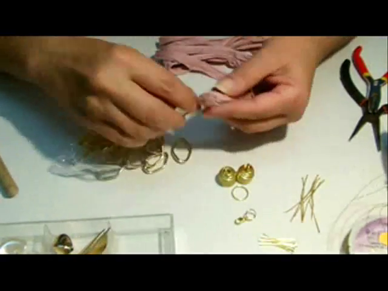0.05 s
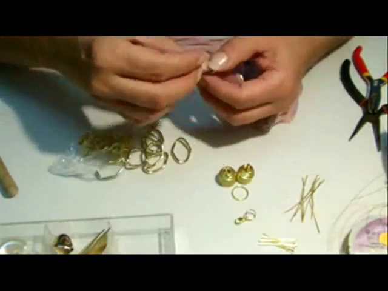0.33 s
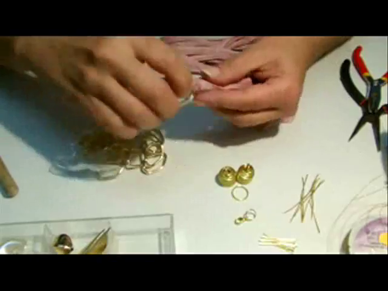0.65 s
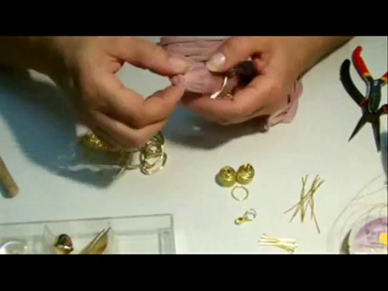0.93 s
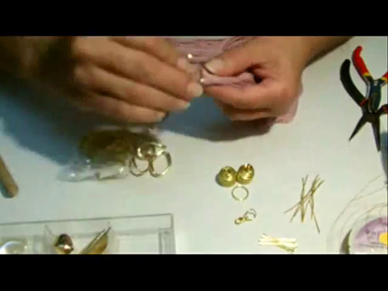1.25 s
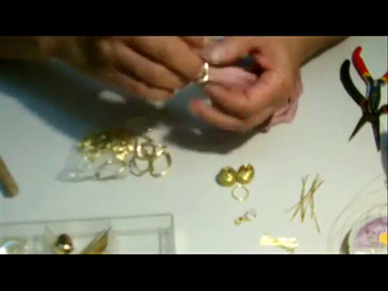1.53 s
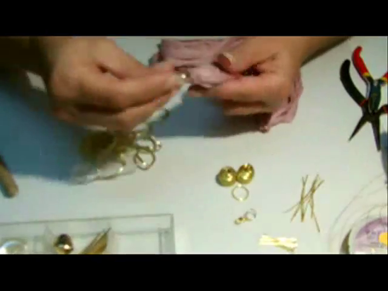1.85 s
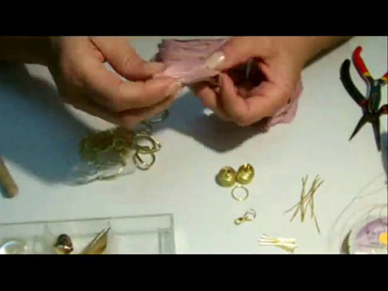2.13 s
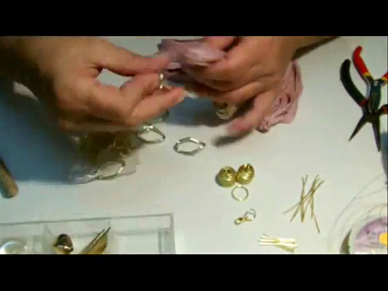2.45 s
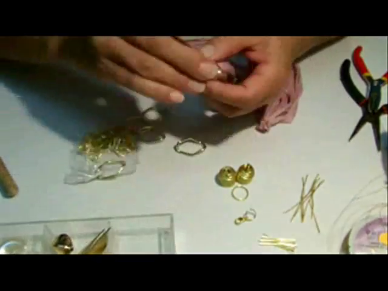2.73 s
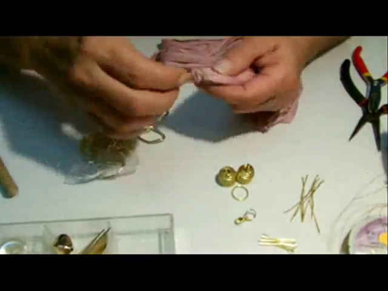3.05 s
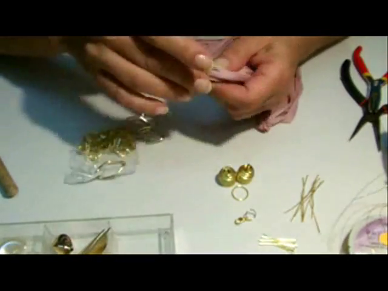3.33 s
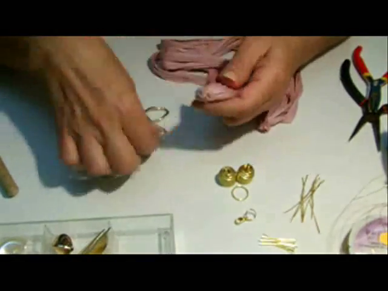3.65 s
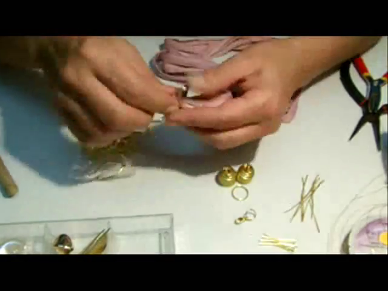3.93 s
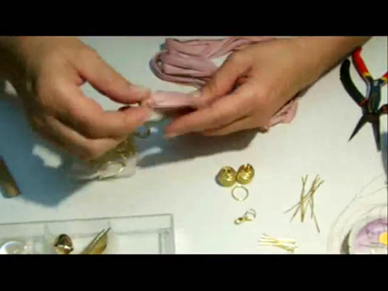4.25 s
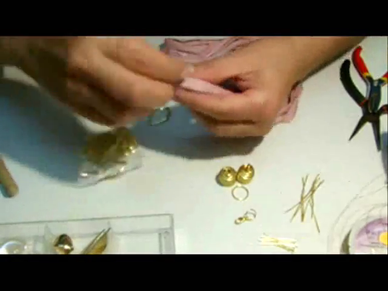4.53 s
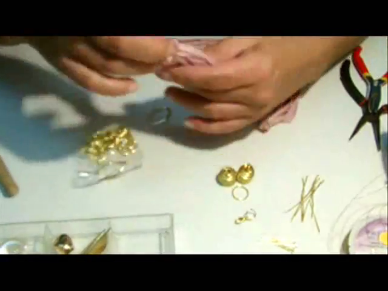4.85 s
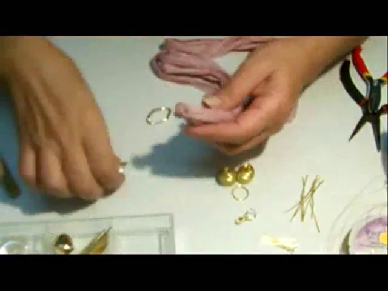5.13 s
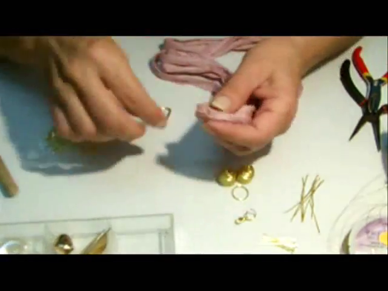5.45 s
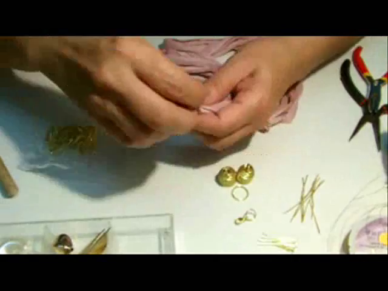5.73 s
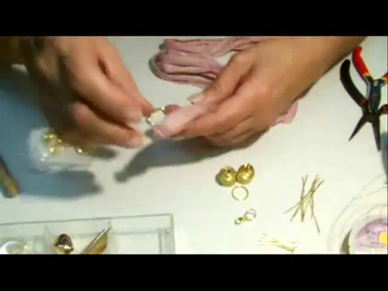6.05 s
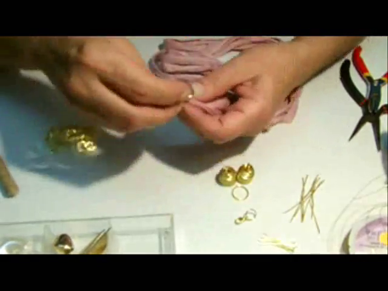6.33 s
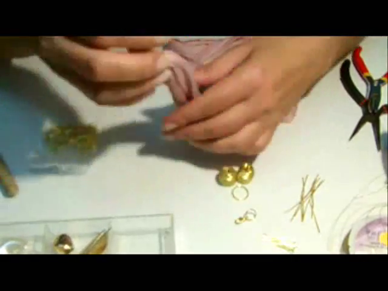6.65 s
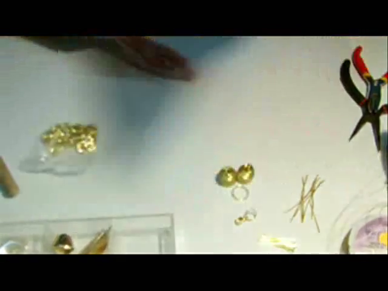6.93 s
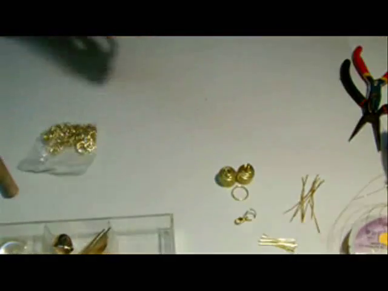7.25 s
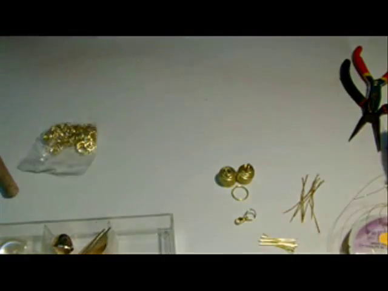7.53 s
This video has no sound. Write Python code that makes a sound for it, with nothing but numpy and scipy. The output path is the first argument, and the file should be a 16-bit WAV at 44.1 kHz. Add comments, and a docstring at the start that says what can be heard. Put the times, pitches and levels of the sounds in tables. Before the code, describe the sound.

Small metal chain links click and clink as they are handled on a table, with a plastic bag crackling over steady hiss.

```python
"""A work table in a small room, stereo microphone close in, over a steady hiss: hands thread a cloth band
through a metal chain. It opens with dry snaps from gripped links and the plastic bag under them, and a
short drag of the heap. From 1.2 s loose links clink and ring briefly. A larger hoop rings out at 4.3 s,
the snaps are loudest from 5.1 to 5.6 s, then fingers slide faintly along the cloth. In the last half
second the heap is dragged again, rustling and jingling."""
import sys
import numpy as np
from scipy import signal
from scipy.fft import rfft, irfft, next_fast_len
from scipy.io import wavfile
from scipy.ndimage import uniform_filter1d

SR = 44100
rng = np.random.default_rng(int(sys.argv[2]) if len(sys.argv) > 2 else 0)


def inscribe(sig):
    """Save sig as 16-bit PCM at rate SR to the path in sys.argv[1].

    A 1-D sig is mono; a 2-D sig holds one channel per row.
    Samples are clipped to [-1, 1] before scaling.
    """
    pcm = np.round(np.clip(np.atleast_2d(sig).T, -1, 1) * 32767)
    wavfile.write(sys.argv[1], SR, pcm.astype(np.int16))


N = 334719
GRAIN, LEAD = 4096, 1024  # samples: length of one short sound, and its run-up to the impact
LINK_HZ, LINK_T60_S = 8870, 0.013  # ring of an average small link

# Spectrum of the noise floor. Each row: frequency in Hz, relative level in dB.
HISS_COLOUR = [(12, -44), (20, -6), (48, -5.5), (130, -6.5), (168, -9.5), (210, -7.5), (255, -7), (319, -6),
               (542, -6), (1190, -4.5), (2990, -3.5), (3840, -3.5), (7950, -5.5), (14300, -7.5),
               (16000, -23)]
# How alike the hiss is left and right. Each row: frequency in Hz, correlation from 0 to 1.
HISS_CORRELATION = [(60, 0.1), (240, 0.3), (950, 0.15), (3770, 0.66), (15000, 1)]
# Decay of the room. Each row: frequency in Hz, T60 in seconds.
ROOM_DECAY = [(150, 0.0046), (1000, 0.2), (4000, 0.11), (14000, 0.1)]
# Spectrum of the room's tail. Each row: frequency in Hz, relative level in dB.
TAIL_COLOUR = [(100, -1), (1000, -8.5), (2500, -2), (5000, -2.5), (9000, -6.5), (15000, -1.5)]
# Echoes off the table and hands. Each row: delay in seconds, gain in dB.
NEAR_ECHOES = [(.0018, -36.5), (.003, -26), (.0052, -22.5)]
# Sound scattered by table and hands into the side signal. Each row: frequency in Hz, gain in dB.
SIDE_COLOUR = [(60, -6), (250, 0), (1000, -5.5), (2400, -4.5), (4600, -19.5), (8500, -16), (13000, -14.5)]
# Moments when the stereo image opens. Each row: start in seconds, end in seconds.
WIDE_SPANS = [(1.8, 1.9), (3.72, 3.81), (5.0, 5.07), (6.66, 6.71), (7.44, 7.5)]
# The microphone's lean to the left. Each row: frequency in Hz, left over right in dB.
LEFT_LEAN = [(100, 2), (600, 0.5), (2000, 1.2), (5000, 0.5), (12000, 0.5)]
# The heap dragged over its bag. Each row: start in seconds, end in seconds, level in dB.
HEAP_DRAGS = [(0, 0.073, -36.5), (0.657, 0.691, -37.5), (1.01, 1.072, -46), (1.167, 1.24, -30.5),
              (1.84, 1.896, -41), (2.444, 2.531, -34), (2.809, 2.88, -53.5), (3.843, 3.932, -46),
              (4.114, 4.23, -54), (6.614, 6.729, -49.5), (6.776, 7.048, -57.5), (7.113, 7.584, -44),
              (7.23, 7.385, -33), (7.419, 7.44, -27)]
# Spectrum of one tick of the rustle. Each row: frequency in Hz, relative level in dB.
RUSTLE_COLOUR = [(30, -6.5), (180, -8), (450, -8.5), (1100, -6.5), (2600, -7), (3900, -4.5), (5500, -2.5),
                 (7600, -2), (9000, 1.5), (10500, -4.5), (12500, -2), (14300, -6.5), (15500, -14.5)]
# A link pressed down on the table top. Each row: time in seconds, level in dB.
LINK_KNOCKS = [(.036, -29.5), (0.047, -43.5), (1.736, -44)]
# The table top's hollow note. Each row: frequency in Hz, relative level in dB, T60 in seconds.
TABLE_TOP_MODES = [(967, 0.5, 0.02), (1106, 0, 0.012), (2680, -5, 0.027), (3980, -9, 0.018)]
# The heap bumping the table. Each row: time in seconds, level in dB.
HEAP_BUMPS = [(1.181, -43), (4.523, -42), (5.15, -34), (7.138, -41), (7.337, -40.5)]
# The board's low modes. Each row: frequency in Hz, relative level in dB, T60 in seconds.
BOARD_MODES = [(86, -17, 0.08), (137, -2, 0.055), (198, 2.5, 0.039)]
# Bag creases and gripped links snapping. Each row: time in seconds, level in dB,
# scrape time in seconds, treble tilt in dB per octave.
DRY_SNAPS = [(0.04, -31, 0.0026, -4), (0.0658, -28, 0.0014, 1), (0.0918, -25.5, 0.00017, 0),
             (0.2461, -40.5, 0.000053, 1), (.2826, -45, .001, 2), (0.4254, -42.5, 0.00021, 1),
             (0.5794, -34, 0.0049, 1.5), (.604, -39.5, .0008, 3), (0.6655, -24.5, 0.00019, 1.5),
             (1.0236, -37, .005, 5.5), (1.1147, -36, .0023, 3), (1.1767, -21.5, .0002, 1.5),
             (1.181, -21.5, 0.00051, 7.5), (1.7171, -38.5, .0026, 0), (1.7364, -39, 0.0039, -2.5),
             (2.223, -33, 0.0028, 0.5), (2.449, -24, 0.00017, 8), (2.46, -24, 0.0033, .5),
             (2.506, -29, .001, 3.5), (2.5981, -36, .0005, 0), (2.931, -39, 0.0017, 1.5),
             (3.0401, -36.5, 0.00024, 2), (3.0472, -37.5, 0.00024, 1.5), (3.668, -24.5, 0.00097, 1),
             (3.7404, -22.5, 0.0019, 1.2), (4.501, -25.5, .004, .3), (4.5227, -23.5, 0.0003, -1.5),
             (4.9672, -45, .0015, 0), (5.0947, -25.5, 0.000048, 1), (5.11, -20.5, .0003, 1.6),
             (5.1219, -27, .0012, 1.8), (5.1495, -18.5, 0.00095, -0.5), (5.159, -24.5, 0.00054, -1),
             (5.1645, -25, 0.001, 4.5), (5.2427, -37, 0.0027, -1.5), (5.2968, -38, 0.0037, 1),
             (5.459, -41, 0.00088, 0), (5.5173, -17, 0.00043, 3), (5.548, -21.5, 0.0021, 2),
             (5.5734, -24, 0.00066, 1.5), (5.5873, -24.5, 0.00019, 3), (5.661, -32, 0.004, -0.2),
             (6.1537, -38, 0.0011, 0.3), (6.2165, -40, .0004, -1), (6.6657, -36.5, .0003, 4),
             (6.6846, -27, 0.00062, 3), (6.7213, -32.5, 0.00094, 0.5), (6.7982, -38.5, 0.0022, -.5),
             (6.8707, -31.5, 0.0011, 6), (7.1366, -27.5, .0023, 8), (7.3763, -28, 0.0017, 1)]
# Spectrum of a snap before its tilt. Each row: frequency in Hz, relative level in dB.
SNAP_SPECTRUM = [(30, -4.5), (250, -2), (700, -2.5), (1200, -4), (2800, -3), (4200, -1), (5300, -2.5),
                 (7300, 0.5), (12600, -4.5), (15000, -6.5)]
# Spectrum of metal touching metal. Each row: frequency in Hz, relative level in dB.
CONTACT_SPECTRUM = [(30, -6), (200, -0.5), (1200, -0.5), (2500, -2), (4000, -2), (5500, -1), (9000, 11.5),
                    (12000, -0.5), (15000, -8.5)]
# The large oval hoop struck. Each row: time in seconds, level in dB, pitch in Hz, slide-in in seconds.
HOOP_CLINKS = [(.0922, -28.5, 4110, 0.00011), (4.3478, -16.5, 5300, 0.00031), (5.5175, -19, 5250, 0.000083),
               (6.2246, -25.5, 5450, .0001)]
# The hoop's modes. Each row: multiple of its pitch, relative level in dB.
HOOP_MODES = [(0.509, -6), (0.602, -9), (.78, 1), (0.999, 1.5), (1.08, -2), (1.25, -5), (1.52, -4),
              (1.69, -7.5)]
# Small links colliding. Each row: time in seconds, level in dB, pitch in Hz, slide-in in seconds.
LINK_CLINKS = [(1.221, -21, 9100, 0.0026), (1.2332, -22, 9230, 0.0023), (1.816, -28, 8400, 0.00024),
               (1.848, -22, 9330, 0.0018), (1.8814, -29.5, 9450, .0002), (2.0577, -39, 8550, .0002),
               (2.23, -32.5, 8370, 0.00082), (2.2764, -32.5, 8840, .0002), (2.3636, -24, 8530, 0.00033),
               (2.4797, -22, 9300, 0.00083), (2.5417, -28.5, 8000, .002), (2.8313, -34, 8800, .002),
               (2.9143, -42, 9100, .0002), (3.0066, -39, 9100, 0.00048), (3.1377, -39, 9050, 0.00053),
               (3.5725, -36, 8660, .0008), (3.6102, -34, 9130, .0002), (3.7851, -22, 8760, 0.0027),
               (4.1942, -31.5, 9050, 0.00061), (4.2877, -28.5, 7800, 0.00024), (4.3959, -40.5, 8250, .0002),
               (5.012, -24, 9380, 0.0029), (5.036, -22, 8780, 0.0021), (6.0634, -44.5, 9800, .0002),
               (6.1393, -37, 8500, .0002), (6.6233, -33, 9900, .0002), (6.6336, -32, 9100, 0.00095),
               (6.6756, -26, 8880, 0.00027), (7.1513, -25.5, 8180, 0.0005), (7.2465, -26, 8580, 0.00091),
               (7.317, -20.5, 8920, 0.0047), (7.339, -19.5, 8600, 0.0038), (7.4652, -23.5, 8910, 0.0045),
               (7.5021, -30.5, 8900, 0.00032), (7.5178, -28.5, 10100, 0.0011)]
# Bending modes of one link. Each row: multiple of its pitch, relative level in dB.
LINK_MODES = [(.62, -24), (.87, -9.5), (.95, 0.5), (1, 4), (1.05, -1.5), (1.1, -13), (1.51, -5.5),
              (1.59, -14.5), (1.66, -1)]


def amp(db):
    """Decibels to gain."""
    return 10 ** (np.asarray(db) / 20)


def unit_rms(x):
    """Scales to an rms of one."""
    return x / np.sqrt(np.mean(x ** 2) + 1e-20)


def hit_energy(x):
    """Scales a short sound to the energy of 10 ms at full level."""
    return x * np.sqrt(SR / 100 / (np.sum(x ** 2) + 1e-20))


def curve(points, hz):
    """Reads a (Hz, value) table on a log-frequency axis."""
    point_hz, value = np.transpose(points)
    return np.interp(np.log(hz + 1), np.log(point_hz + 1), value)


def add(mix, start_s, sound):
    """Mixes a sound in at its start time."""
    part = mix[max(round(start_s * SR), 0):][:len(sound)]
    part += sound[:len(part)]


def click(colour, tilt_db, ripple_db):
    """A sharp-fronted click of a given colour, with chance resonances of its own."""
    hz = np.fft.rfftfreq(GRAIN, 1 / SR)
    ripple = unit_rms(uniform_filter1d(uniform_filter1d(rng.standard_normal(len(hz)), size=50), size=30))
    octaves = np.log2(np.clip(hz, 400, 11000) / 4000)
    db = curve(colour, hz) + tilt_db * octaves + ripple_db * ripple
    log_gain = np.log(amp(np.maximum(db, db.max() - 60)))
    mirrored = np.concatenate([log_gain, log_gain[-2:0:-1]])
    return np.fft.ifft(np.exp(np.conj(signal.hilbert(mirrored)))).real  # minimum phase


def scrape(before_s, after_s, grit):
    """Tiny slips build up to an impact at sample LEAD and then die away."""
    t = (np.arange(GRAIN) - LEAD) / SR
    slips = rng.standard_normal(GRAIN) * (rng.random(GRAIN) < .4)
    fade_s = np.maximum(np.where(t < 0, before_s, after_s), 1 / SR)
    force = grit * slips * np.exp(-abs(t) / fade_s)
    force[LEAD] = 1
    return force


def metal_ring(modes, hz, t60, detune=0.017, uneven_db=1.5):
    """The free ring of one piece of metal; no two are quite alike."""
    t = np.arange(GRAIN) / SR
    ratio, db = np.transpose(modes)[:, :, None]
    pitch, strength, turn = rng.standard_normal((3, len(modes), 1))
    phase = 2 * np.pi * (hz * ratio * (1 + detune * pitch) * t + turn)
    decay = np.exp(-np.log(1000) * t / t60)
    return (amp(db + uneven_db * strength) * decay * np.sin(phase)).sum(0)


def hiss(level_db=-54.5):
    """The steady noise floor: wide in the bass, centred in the treble."""
    hz = np.fft.rfftfreq(N, 1 / SR)
    left, independent = rfft(rng.standard_normal((2, N)))
    shared = curve(HISS_CORRELATION, hz)
    right = shared * left + np.sqrt(1 - shared ** 2) * independent
    spectra = np.array([left, right]) * amp(curve(HISS_COLOUR, hz))
    return amp(level_db) * unit_rms(irfft(spectra, N))


def reflections(x, t60s, colour, count=3, shift_hz=1.297):
    """Sparse dying reflections; the pattern keeps changing as the hands move."""
    length, out = SR // 4, np.zeros(N)
    gain = amp(curve(colour, np.fft.rfftfreq(2 * length, 1 / SR)))
    for k in range(count):
        taps = rng.standard_normal(length) * (rng.random(length) < .3) * (np.arange(length) > SR // 1000)
        hz, t, bands = signal.stft(taps, SR, nperseg=64)
        decay = np.exp(-np.log(1000) * t / curve(t60s, hz)[:, None])
        tail = signal.istft(bands * decay, SR)[1]
        tail = irfft(rfft(tail / np.linalg.norm(tail), 2 * length) * gain)
        crossfade = np.sqrt(2 / count) * np.cos(np.pi * (np.arange(N) / SR * shift_hz + k / count))
        out += signal.oaconvolve(x * crossfade, tail[:length])[:N]
    return out


def room(x, wet_db=-9, side_db=-9, scatter_t60=0.015):
    """Direct sound, near echoes and the small room's short tail at the microphone, as mid and side."""
    mid = x + amp(wet_db) * reflections(x, ROOM_DECAY, TAIL_COLOUR)
    for delay_s, db in NEAR_ECHOES:
        add(mid, delay_s, amp(db) * x)
    scattered = reflections(x, [(1000, scatter_t60)], SIDE_COLOUR)
    side_tail = amp(wet_db + side_db) * reflections(x, ROOM_DECAY, TAIL_COLOUR)
    return mid, scattered + side_tail


def widen(side, narrow_db=-1.5, wide_db=7, above_hz=2500):
    """The treble sits near the centre of the image, but now and then spreads to the sides."""
    t = np.arange(N) / SR
    wide = uniform_filter1d(sum(1. * (t > start) * (t < end) for start, end in WIDE_SPANS), size=400)
    treble = signal.sosfiltfilt(signal.butter(2, above_hz, "high", fs=SR, output="sos"), side)
    return amp(narrow_db) * side + amp(wide_db) * wide * treble


def cloth_rub(start_s=5.82, end_s=6.01, centre_hz=3760, width_hz=700, level_db=-61):
    """Fingers slide along the cloth with a faint, narrow whisper."""
    off_centre = 2 * (np.fft.rfftfreq(N, 1 / SR) - centre_hz) / width_hz
    whisper = unit_rms(irfft(rfft(rng.standard_normal(N)) / (1 + off_centre ** 2), N))
    progress = np.clip((np.arange(N) / SR - start_s) / (end_s - start_s), 0, 1)
    return amp(level_db) * whisper * np.sin(np.pi * progress)


def drag_power(edge_s=0.0048):
    """How hard the heap is being dragged: each pull sets in, holds and stops."""
    t = np.arange(N) / SR
    return sum(amp(db) ** 2 * np.clip(np.minimum(t - start, end - t) / edge_s + .5, 0, 1)
               for start, end, db in HEAP_DRAGS)


def crackle(per_s, spread_db, ripple_db, count):
    """A stream of tiny clicks of uneven size from several spots."""
    out = np.zeros(N)
    for _ in range(count):
        size = amp(spread_db * np.minimum(rng.exponential(1, N), 3.5)) * rng.choice([-1, 1], N)
        ticks = size * (rng.random(N) < per_s / count / SR)
        out += signal.oaconvolve(ticks, click(RUSTLE_COLOUR, 0, ripple_db))[:N]
    return unit_rms(out)


def heap_rustle(hits, drag_db=0.5, stir_db=-15, stir_s=0.0013, clump_db=3.5, idle_db=-60):
    """The heap rustles while dragged and stirs around every hit; stray ticks thicken while it moves."""
    smear = np.exp(-abs(np.arange(-LEAD, LEAD + 1)) / SR / stir_s)
    stir_power = abs(signal.oaconvolve(hits ** 2, smear / smear.sum(), "same"))
    power = amp(drag_db) ** 2 * drag_power() + amp(stir_db) ** 2 * stir_power
    flutter = unit_rms(uniform_filter1d(rng.standard_normal(N), size=150))
    clumps = unit_rms(amp(clump_db * flutter))  # links catch and let go
    moving = np.sqrt(power) * clumps * crackle(per_s=6000, spread_db=-0.5, ripple_db=3, count=6)
    busy = uniform_filter1d(1. * (power > amp(idle_db) ** 2), size=4000)
    stray_ticks = amp(-64) * crackle(per_s=16, spread_db=3, ripple_db=3, count=4)
    busy_ticks = amp(-49) * busy * crackle(per_s=150, spread_db=3.2, ripple_db=2, count=4)
    return moving + stray_ticks + busy_ticks


def heap_jingle(gain_db=-5, per_s=160, spread_db=3, pitch_spread=0.039, count=6):
    """Loose links in the dragged heap knock together by chance, as hard as the pull."""
    out = np.zeros(N)
    for _ in range(count):
        hz = LINK_HZ * (1 + pitch_spread * rng.standard_normal())
        ring = metal_ring(LINK_MODES, hz, LINK_T60_S)
        link = hit_energy(signal.fftconvolve(scrape(before_s=0.00052, after_s=0.0041, grit=0.2), ring))
        size = amp(spread_db * np.minimum(rng.exponential(1, N), 2))
        strikes = size * (rng.random(N) < per_s / count / SR)
        out += signal.oaconvolve(strikes, link)[LEAD:][:N]
    return amp(gain_db) * np.sqrt(drag_power()) * unit_rms(out)


def table_knocks(events, modes):
    """The table rings briefly under each blow."""
    out, t = np.zeros(N), np.arange(GRAIN) / SR
    note = sum(amp(db) * np.exp(-np.log(1000) * t / t60) * np.sin(2 * np.pi * hz * t)
               for hz, db, t60 in modes)
    for time_s, db in events:
        add(out, time_s, amp(db) * hit_energy(note))
    return out


def snaps(settle_s=0.007, settle_db=-12):
    """Each bag crease or gripped link gives way with a broad click, then settles with a smaller one."""
    out = np.zeros(N + LEAD)
    for time_s, db, scrape_s, tilt_db in DRY_SNAPS:
        crack = click(SNAP_SPECTRUM, tilt_db, ripple_db=1.23)
        for delay_s, drop_db in [(0, 0), (settle_s * (.5 + rng.random()), settle_db)]:
            force = scrape(before_s=0.81 * scrape_s, after_s=2.06 * scrape_s, grit=0.63)
            snap = hit_energy(signal.fftconvolve(force, crack))
            add(out, time_s + delay_s, amp(db + drop_db) * snap)
    return out[LEAD:]


def clinks(events, modes, t60, gain_db, ring_db, ring_per_db, chatter_s, restrike, grit, usual_db=-30):
    """Metal pieces slide, meet and chatter; the hit's level sets the balance of ring and contact noise."""
    out = np.zeros(N + LEAD)
    for time_s, db, hz, slide_s in events:
        ring = signal.fftconvolve(scrape(slide_s, chatter_s, restrike), metal_ring(modes, hz, t60))
        slips = scrape(slide_s, chatter_s, grit)
        contact = signal.fftconvolve(slips, click(CONTACT_SPECTRUM, tilt_db=0, ripple_db=1.5))
        ring_gain = amp(ring_db + ring_per_db * (db - usual_db))
        clink = ring_gain * hit_energy(ring) + hit_energy(contact)
        add(out, time_s, amp(db + gain_db) * hit_energy(clink))
    return out[LEAD:]


def scene():
    """The chain and its bag lie close to the microphone, a little to the left."""
    links = clinks(LINK_CLINKS, LINK_MODES, t60=LINK_T60_S, gain_db=0.5, ring_db=1.5, ring_per_db=0.67,
                   chatter_s=0.004, restrike=0.14, grit=1.2)
    hoop = clinks(HOOP_CLINKS, HOOP_MODES, t60=0.0093, gain_db=0, ring_db=1, ring_per_db=-0.3,
                  chatter_s=0.0029, restrike=0.13, grit=0.44)
    hits = snaps() + links + hoop
    table = table_knocks(LINK_KNOCKS, TABLE_TOP_MODES) + table_knocks(HEAP_BUMPS, BOARD_MODES)
    mid, side = room(hits + table + heap_rustle(hits) + heap_jingle() + cloth_rub())
    side = widen(side)
    size = next_fast_len(N + GRAIN)
    lean_db = curve(LEFT_LEAN, np.fft.rfftfreq(size, 1 / SR))
    spectra = rfft(np.array([mid + side, mid - side]), size) * amp([lean_db / 2, -lean_db / 2])
    return irfft(spectra, size)[:, :N] + hiss()


def record(dry):
    """The recorder clips at full scale and cuts the treble above 15.3 kHz."""
    low_pass = signal.firwin(301, 15300, window=("kaiser", 9), fs=SR)
    return signal.oaconvolve(np.clip(dry, -1, 1), low_pass[None], "same")


dry = scene()
out = record(dry)
inscribe(out)
```